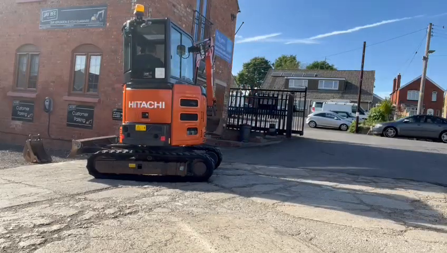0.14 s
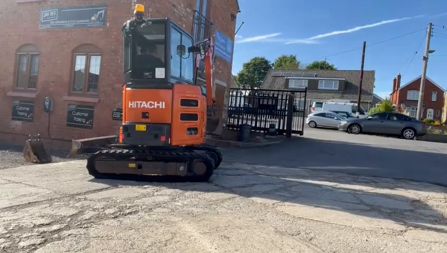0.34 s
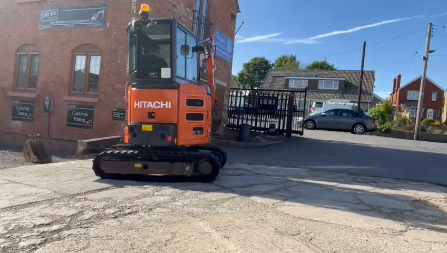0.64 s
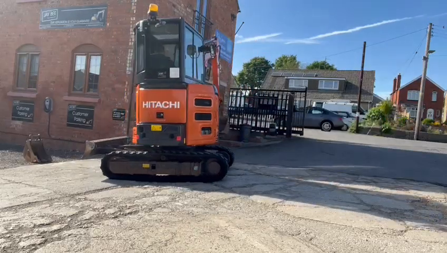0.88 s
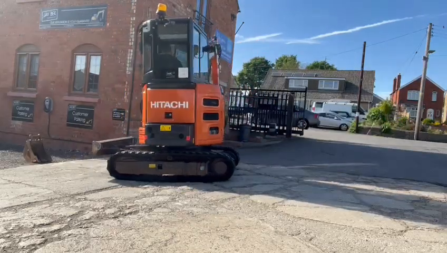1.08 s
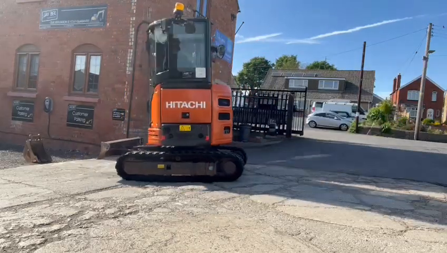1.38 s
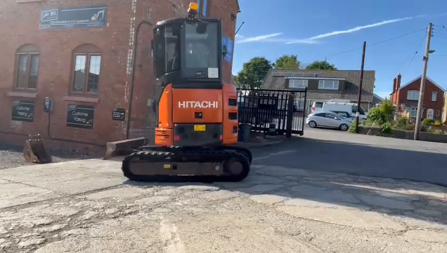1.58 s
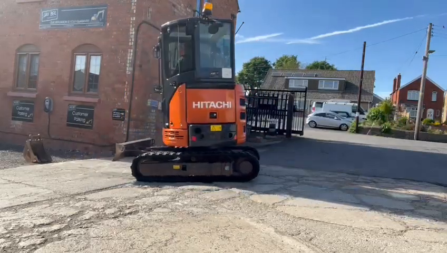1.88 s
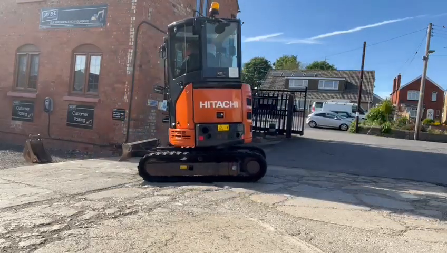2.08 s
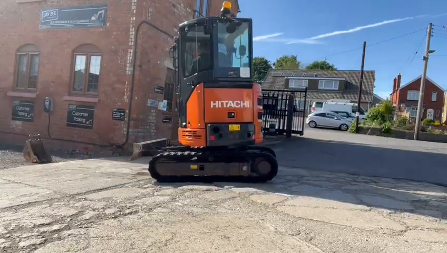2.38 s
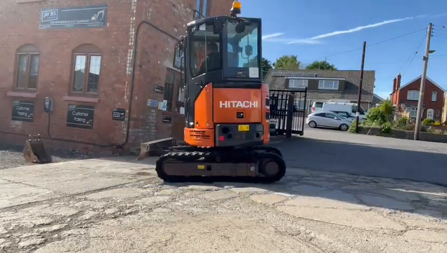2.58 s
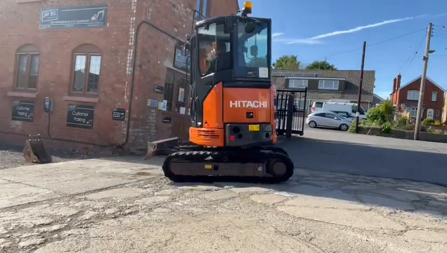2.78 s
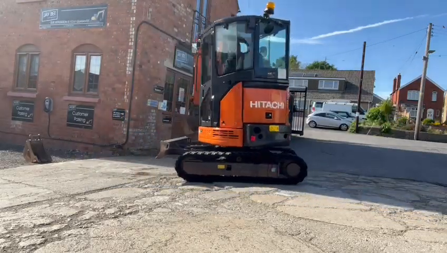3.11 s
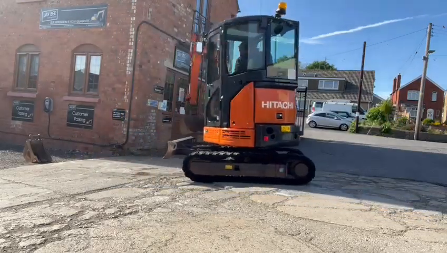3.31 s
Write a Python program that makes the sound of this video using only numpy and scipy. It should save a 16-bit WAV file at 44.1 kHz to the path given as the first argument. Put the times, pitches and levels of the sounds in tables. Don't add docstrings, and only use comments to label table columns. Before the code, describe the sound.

A mini excavator's diesel starts subdued, then booms steadily under load as it turns; rubber tracks scuff grit and the frame knocks rapidly. Outdoor yard, about ten metres away, stereo microphone with light wind buffeting.

```python
import sys
import numpy as np
from scipy import signal
from scipy.fft import rfft, irfft
from scipy.io import wavfile
from scipy.ndimage import uniform_filter1d

SR = 44100
rng = np.random.default_rng(int(sys.argv[2]) if len(sys.argv) > 2 else 0)


def materialize(psi):
    bounded = np.clip(np.atleast_2d(psi).T, -1, 1)
    quanta = np.round(bounded * 32767).astype(np.int16)
    wavfile.write(sys.argv[1], SR, quanta)


def makeup_ratio(level_db):
    decades = np.asarray(level_db, float) / 20
    return 10 ** decades


N = 152145
T = np.arange(N) / SR

# (time [s], twice the firing rate [Hz], boom level [dB])
ENGINE = [(0.5, 91.3, -22), (0.53, 91.8, -31.5), (0.7, 91.85, -17.5), (0.86, 90, -14.5),
          (0.93, 92.4, -17.5), (0.939, 95.7, -26.5), (1.229, 96.3, -22.5), (1.47, 96.5, -27.5),
          (1.94, 95.7, -23), (1.951, 94.2, -38), (1.989, 95.8, -20.5), (2.44, 96.54, -14.5),
          (3.34, 96.2, -14.5), (3.45, 99.3, -15)]
# (multiple of firing rate [-], facing away [dB to boom], facing us [dB to boom], waver [dB])
EXHAUST = [(1, -13, -9, 1.5), (2, 2.06, 1.13, 0.17), (3, -23, -13, 1.5), (4, -25.5, -11, .8),
           (5, -46, -22, -0.5), (6, -28.5, -29, 3.5), (7, -32.5, -35, 1.5), (10, -35, -32, 6)]
# (multiple of firing rate [-], level [dB to boom])
UNEVEN_CYLINDERS = [(2 / 3, -36), (4 / 3, -29), (5 / 3, -30.5), (7 / 3, -29), (8 / 3, -25.5),
                    (10 / 3, -31.5), (13 / 3, -27)]
# (time [s], level [dB])
TRACK_EFFORT = [
    (0.0, -35),
    (0.29, -36.5),
    (0.3, -38.5),
    (0.33, -34),
    (0.49, -37),
    (0.75, -30.5),
    (1.78, -31.5),
    (1.88, -27),
    (3.28, -29.5),
    (3.45, -31),
]
# (frequency [Hz], level [dB per Hz])
SCUFF = [(150, 2.5), (300, -6), (600, -4.5), (1100, -2), (1700, -6), (2400, -9.5), (3200, -11),
         (5000, -25.5)]
GRIT_HZ = [500, 790, 1167, 1510, 2200, 2970]
# (time [s], peak level [dB], pitch [Hz])
KNOCKS = [(0.13, -32, 668), (0.177, -33, 980), (0.295, -25, 940), (0.559, -28.5, 1190), (0.584, -41, 725),
          (0.648, -15.5, 977), (0.751, -14, 990), (0.813, -18.5, 960), (0.896, -13.5, 697),
          (0.935, -19.5, 580), (1.015, -19.5, 890.5), (1.042, -31, 800), (1.077, -15, 1130),
          (1.144, -21, 618.4), (1.192, -15.5, 756), (1.293, -21, 1230), (1.33, -24, 834),
          (1.346, -19.5, 624.5), (1.415, -18, 667), (1.481, -22, 946), (1.532, -23.5, 796),
          (1.566, -22, 768), (1.619, -18.5, 800), (1.687, -15.5, 1040), (1.829, -20, 870),
          (1.873, -18, 626), (1.891, -16, 1004), (1.998, -19, 1395), (2.041, -15, 1350),
          (2.119, -29.5, 1286), (2.169, -16, 1020), (2.22, -20, 1000), (2.267, -17, 1102),
          (2.309, -18, 772), (2.336, -16, 1040), (2.361, -13.5, 653), (2.396, -22, 1431),
          (2.468, -20, 1144), (2.542, -33, 1160), (2.559, -14, 656), (2.65, -13.5, 787), (2.68, -20, 1114),
          (2.746, -14, 650), (2.772, -14.5, 632), (2.826, -14.5, 664.7), (2.867, -20.5, 1375),
          (2.918, -12, 695), (2.954, -16.5, 1183), (3.01, -11.5, 823), (3.016, -16.5, 1099),
          (3.093, -16, 925), (3.107, -16, 636.3), (3.123, -19, 1041), (3.187, -9.5, 660),
          (3.21, -12.5, 698.5), (3.28, -12.5, 910), (3.293, -20, 771), (3.326, -17, 1081),
          (3.373, -15, 660), (3.422, -16.5, 791)]
# (frequency [Hz], level [dB per Hz])
TICK = [(300, -11.5), (800, 4), (1500, 2.1), (2300, -3.5), (3800, -7.5), (5000, -35)]
# (frequency [Hz], level [dB per Hz])
HISS_AWAY = [(1500, -20), (2500, 0.1), (3800, -6), (5800, -8), (6700, -5), (8500, -9), (9700, -17),
             (11000, -16)]
# (frequency [Hz], level [dB per Hz])
HISS_NEAR = [(1500, -9), (3000, -11.5), (4600, 6), (5200, 1.5), (6000, 4), (8300, -1), (9800, -24),
             (11100, -37)]
# (frequency [Hz], level [dB per Hz])
RUMBLE = [(25, -26), (45, 9), (90, 0.8), (160, -3.5), (300, -6), (600, -14.5), (1500, -31)]
# (frequency [Hz], level [dB per Hz])
WIND = [(28, -58), (55, 2), (90, -0.5), (200, -13.5), (450, -16.5), (900, -28.5), (1600, -31), (4000, -98)]
# (time [s], level [dB])
BREEZE = [(0, -40), (.2, -25.5), (.55, -28), (.7, -28.5), (.9, -21), (1.4, -23), (1.5, -34.5), (1.62, -25),
          (2.05, -36.5), (2.2, -79), (2.62, -58), (2.7, -25.5), (3.45, -22.5)]
# (time [s], level [dB], length [s], brightness [Hz])
BUFFETS = [(0.141, -23, 0.014, 500), (.268, -17, .03, 156), (0.295, -21.5, .011, 980),
           (0.313, -18, 0.011, 573), (0.342, -21, .01, 407), (0.428, -25, 0.016, 500),
           (0.453, -19, 0.029, 120), (0.905, -23, .016, 690), (.972, -27, .014, 500),
           (1.1, -20, 0.029, 697), (1.163, -27, .012, 500), (1.277, -17.5, 0.034, 110.7),
           (1.341, -18.5, 0.031, 696), (1.389, -20.5, 0.0092, 587), (1.57, -26.5, .016, 500),
           (1.6, -18.5, .04, 160)]
# (time [s], share come ahead [0-1])
BEARING = [
    (0, .02),
    (1.0, .04),
    (2.0, .17),
    (2.6, .59),
    (3.15, .98),
]
# (frequency [Hz], left-right likeness [0-1])
SAME_ASIDE = [(60, .98), (300, .9), (1000, .75), (2800, .62), (3800, .86), (4700, .58), (5800, .64),
              (11000, .5)]
# (frequency [Hz], left-right likeness [0-1])
SAME_AHEAD = [(60, .995), (300, .98), (600, .8), (1200, .95), (3000, .9), (4800, .6), (5900, .85),
              (8500, .62)]
# (frequency [Hz], left leads by [rad])
LEAD_ASIDE = [(0, 0), (900, .2), (2400, 2.2), (3700, 3.1), (5700, 3.3), (6600, 4.3), (9300, 4.2),
              (11000, 4.6)]
# (frequency [Hz], left leads by [rad])
LEAD_AHEAD = [(0, 0), (3000, .1), (4500, .3), (6200, -.2), (7200, 3.2), (8000, 4.1), (9500, 4.2),
              (11000, 4.7)]
# (frequency [Hz], left over right [dB])
TILT = [(100, .2), (1000, 1.5), (2500, -.3), (5000, 1.5), (6000, .2), (6800, -4), (8200, -1.5),
        (10000, -.1)]
# (frequency [Hz], threshold under the other [dB])
DROP_UNDER = [(100, -24), (500, -18), (1500, -10), (3000, -7.3), (4200, -6), (5200, -6.3), (6000, -5),
              (11000, -4.5)]
# (frequency [Hz], threshold [dB])
FAINT = [(7500, -4.5), (8800, -2.6), (9400, -.6), (9900, -.2), (10400, -1.4), (11000, -1.6), (11400, -.6),
         (11750, 1)]

TURN_S, TURN_WIDTH_S = 2.09, 0.09


def evened(x):
    return x / np.sqrt(np.mean(x ** 2) + 1e-20)


def read(points, hz):
    f, value = np.transpose(points)
    return np.interp(np.log(hz + 1), np.log(f + 1), value)


def over_time(points):
    return np.interp(T, *np.transpose(points))


def noise():
    return rng.standard_normal((2, N))


def drift(top_hz):
    t = T[::128]
    rates = np.geomspace(top_hz / 10, top_hz, 12)
    wander = sum(np.sin(2 * np.pi * (f * t + rng.random())) / np.sqrt(f) for f in rates)
    return np.interp(T, t, evened(wander))


def facing(mid_s, width_s):
    return 1 / (1 + np.exp((mid_s - T) / width_s))


def colour(x, points):
    hz = np.fft.rfftfreq(N, 1 / SR)
    return evened(irfft(rfft(x) * makeup_ratio(read(points, hz)), N))


def firing():
    idle_s, idle_db = 0.514, -38
    s, hz, db = np.transpose(ENGINE)
    double_rate = np.interp(T, s, hz) * (1 + 0.0033 * drift(8.0))
    angle = np.pi * np.cumsum(double_rate) / SR
    return angle, np.interp(T, np.r_[idle_s, s], np.r_[idle_db, db])


def exhaust(angle, boom_db):
    near = facing(TURN_S, TURN_WIDTH_S)
    pipe_bend = 0.85
    out = np.zeros(N)
    for order, away_db, near_db, waver_db in EXHAUST:
        level_db = boom_db + away_db + (near_db - away_db) * near + waver_db * drift(14.0)
        out += makeup_ratio(level_db) * np.cos(order * angle - pipe_bend * (2 * order - 3) ** 2 / 4)
    for order, db in UNEVEN_CYLINDERS:
        out += makeup_ratio(boom_db + db + 3.8 * drift(9.1)) * np.cos(order * angle + 6 * rng.random())
    return np.sqrt(2) * (out + near ** 2 * pump(angle))


def pump(angle):
    pump_hz, level_db, beat_db = 277.6, -34, -3.5
    turning = 2 * np.pi * np.cumsum(pump_hz * (1 + 0.0055 * drift(5.5))) / SR
    whine = np.cos(turning) + makeup_ratio(beat_db + 5.8 * drift(4.31)) * np.cos(turning + angle)
    return makeup_ratio(level_db + 1.7 * drift(11.0)) * whine


def tracks(angle):
    lug_hz, lug_db, grit_share_db = 10.0, 0.8, -13
    surge_db = over_time(TRACK_EFFORT) + lug_db * drift(2 * lug_hz) + np.cos(angle)
    ground = noise() + makeup_ratio(grit_share_db) * evened(grit())
    return makeup_ratio(surge_db + 1.0) * colour(ground, SCUFF) + knocks()


def grit():
    per_s, spread_db = 1100, 3.0
    size = makeup_ratio(spread_db * np.minimum(rng.exponential(1, N), 3.0))
    size = size * (rng.random(N) < per_s / SR)
    kind = rng.integers(0, len(GRIT_HZ), N)
    t = np.arange(600) / SR
    strength = noise() * size
    out = np.zeros((2, N))
    for k, hz in enumerate(GRIT_HZ):
        snap = np.sin(2 * np.pi * hz * t) * np.exp(-t * hz / 2.8) * np.sqrt(hz)
        out += signal.oaconvolve(strength * (kind == k), snap[None])[:, :N]
    return out


def knocks():
    ring_t60_s, ring_db = 0.057, -6.5
    tick_t60_s, tick_db, scrape_t60_s, scrape_db = 0.011, -6.5, 0.084, -9
    t = np.arange(4000) / SR
    tick_and_scrape = makeup_ratio(tick_db - 60 * t / tick_t60_s) + makeup_ratio(scrape_db - 60 * t / scrape_t60_s)
    out, struck = np.zeros((2, N)), np.zeros(N)
    for s, db, hz in KNOCKS:
        ring = np.zeros((2, len(t)))
        for ratio in (.62, .85, 1, 1.23, 1.6, 2.2):
            ring += np.sin(2 * np.pi * hz * ratio * t + 6 * rng.random((2, 1)))
        rise = makeup_ratio(db + ring_db) * np.minimum(t / 0.0011, 1)
        at = slice(round(s * SR), min(round(s * SR) + len(t), N))
        length = at.stop - at.start
        out[:, at] += (rise * makeup_ratio(-60 * t / ring_t60_s) * ring / 2)[:, :length]
        struck[at] += (rise * tick_and_scrape)[:length]
    return out + struck * colour(noise(), TICK)


def hiss(angle):
    away_db, near_db, puff_db, puff_early = -43.5, -37.5, -9, 0.18
    near = facing(1.75, 0.6)
    air = noise()
    mix = (1 - near) * makeup_ratio(away_db) * colour(air, HISS_AWAY)
    mix += near * makeup_ratio(near_db) * colour(air, HISS_NEAR)
    since = uniform_filter1d((angle / (2 * np.pi) + puff_early) % 1, size=60)
    depth_db = puff_db * (.5 + .5 * near) * (1 + .2 * drift(20.0))
    puffs = makeup_ratio(depth_db * (np.minimum(since / .65, 1) - .6) + drift(30.0))
    return mix * puffs + valve_sigh()


def valve_sigh():
    mid_s, length_s, level_db, hz = 1.648, 0.11, -47, 9970
    sigh = colour(noise(), [(hz * 0.33, -25), (hz, 0.1), (hz * 0.83, -6)])
    return sigh * makeup_ratio(level_db) * np.exp(-((T - mid_s) / length_s) ** 2)


def rumble():
    level_db = -34.5 + 5.5 * facing(TURN_S, TURN_WIDTH_S) + 0.3 * drift(14.0)
    return makeup_ratio(level_db) * colour(noise(), RUMBLE)


def wind():
    lump_db, same = 1.5, 0.25
    lumps_db = lump_db * np.array([drift(30.0), drift(28.0)])
    out = makeup_ratio(over_time(BREEZE) + lumps_db) * colour(noise(), WIND)
    for s, db, length, hz in BUFFETS:
        t = np.arange(-2 * length, 2 * length, 1 / SR)
        band = signal.butter(3, [hz / 6, hz], "band", fs=SR)
        puff = signal.lfilter(*band, rng.standard_normal((2, len(t))))
        bell = np.exp(-(np.where(t < 0, 3.0, 1.6) * t / length) ** 2)
        rms = np.sqrt(np.mean((puff * bell) ** 2) / np.mean(bell ** 2))
        out[:, round((s - 2 * length) * SR):][:, :len(t)] += makeup_ratio(db) * puff * bell / rms
    return np.array([out[0], same * out[0] + np.sqrt(1 - same ** 2) * out[1]])


def ports(direct, scattered):
    hz, t, (one, two) = signal.stft(np.array([direct, scattered]), SR, nperseg=512)
    ahead = np.clip(np.interp(t, *np.transpose(BEARING)), 0, 1)
    same = np.outer(read(SAME_ASIDE, hz), 1 - ahead) + np.outer(read(SAME_AHEAD, hz), ahead)
    same = np.clip(same, 0, 1)
    lead = np.outer(np.interp(hz, *np.transpose(LEAD_ASIDE)), 1 - ahead)
    lead += np.outer(np.interp(hz, *np.transpose(LEAD_AHEAD)), ahead)
    tilt = makeup_ratio(read(TILT, hz) / 2)[:, None]
    right = (same * one + np.sqrt(1 - same ** 2) * two) * np.exp(-1j * lead)
    below_edge = (hz < 11750)[:, None]
    return signal.istft(np.array([one * tilt, right / tilt]) * below_edge, SR, nperseg=512)[1][:, :N]


def scene():
    angle, boom_db = firing()
    balance = makeup_ratio(np.array([[.05], [-.05]]))
    body = tracks(angle) + hiss(angle) + rumble()
    return exhaust(angle, boom_db) * balance + ports(*body) + wind()


def smoothed(power, bands, frames):
    return uniform_filter1d(uniform_filter1d(power, size=bands, axis=-2), size=frames, axis=-1)


def thinned(x):
    hz, _, z = signal.stft(np.array([x[0] + x[1], x[0] - x[1]]) / 2, SR, nperseg=1024)
    power = smoothed(abs(z) ** 2, 8, 3)
    kept = power > power[::-1] * makeup_ratio(2 * read(DROP_UNDER, hz))[:, None]
    both = smoothed((abs(z) ** 2).sum(0), 5, 4)
    around = uniform_filter1d(uniform_filter1d(both, size=14, axis=1), size=14, axis=0)
    faint_db = np.where(hz > FAINT[0][0], 2 * read(FAINT, hz), -60)
    kept &= both > around * makeup_ratio(faint_db)[:, None]
    mid, side = signal.istft(z * kept, SR, nperseg=1024)[1][:, :N]
    return np.array([mid + side, mid - side])


def band_limit(x):
    return signal.sosfilt(signal.butter(12, 12730, fs=SR, output="sos"), x)


def record(dry):
    mix = thinned(dry)
    return band_limit(mix)


dry = scene()
out = record(dry)
materialize(out)
```